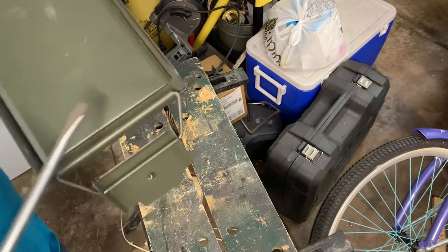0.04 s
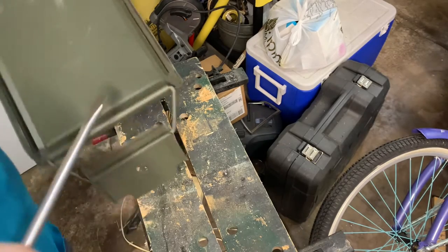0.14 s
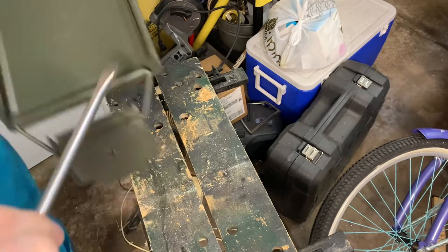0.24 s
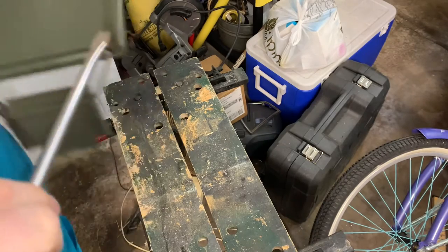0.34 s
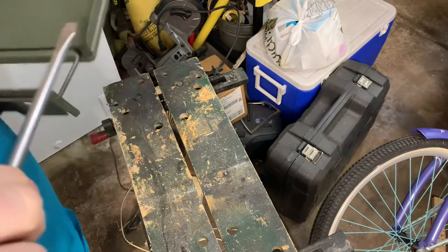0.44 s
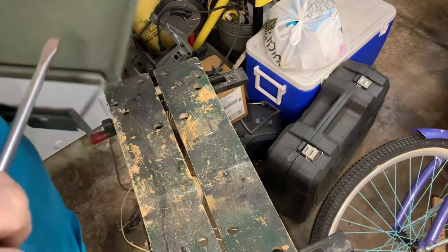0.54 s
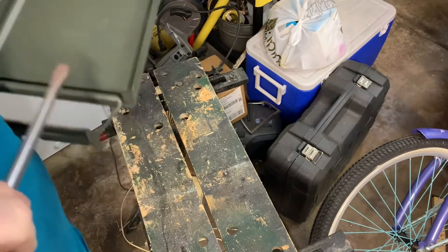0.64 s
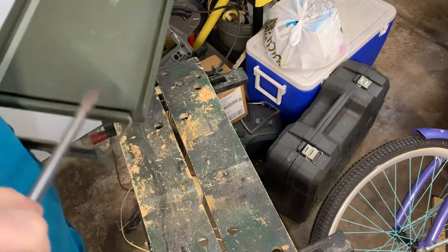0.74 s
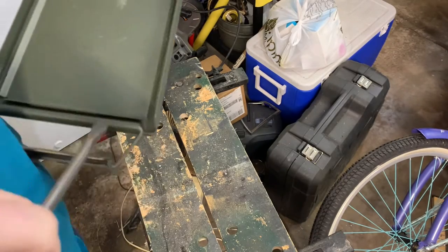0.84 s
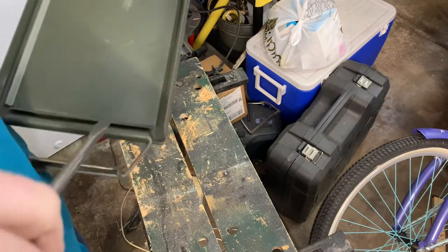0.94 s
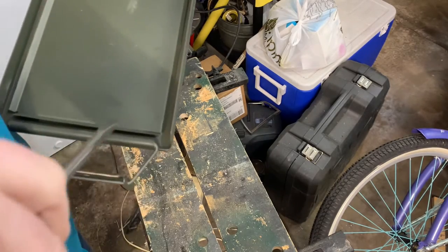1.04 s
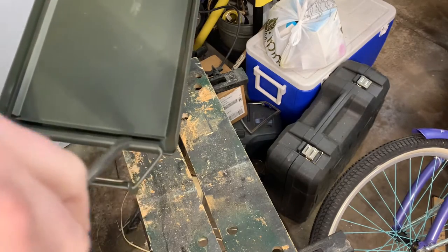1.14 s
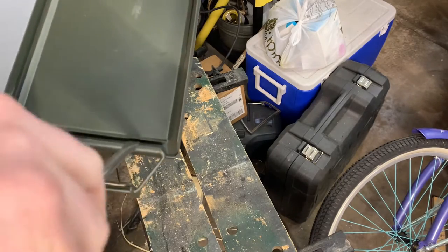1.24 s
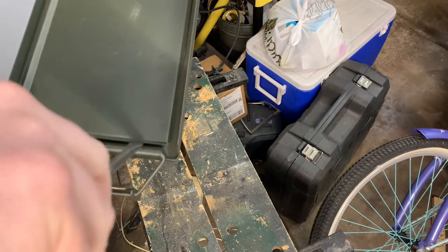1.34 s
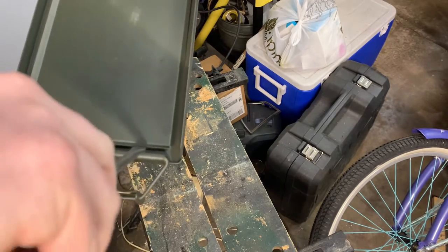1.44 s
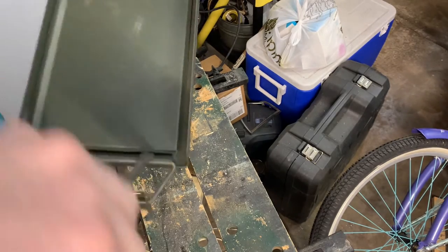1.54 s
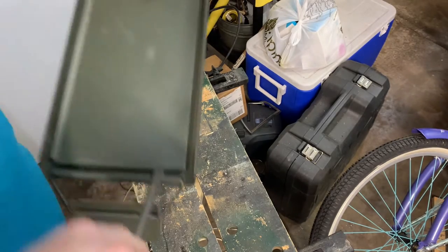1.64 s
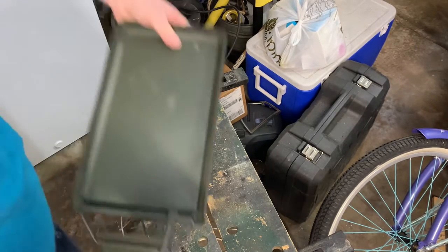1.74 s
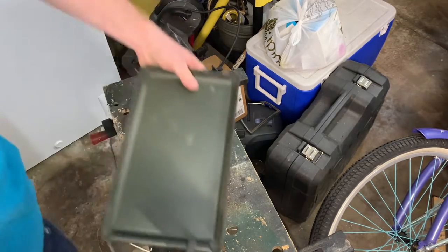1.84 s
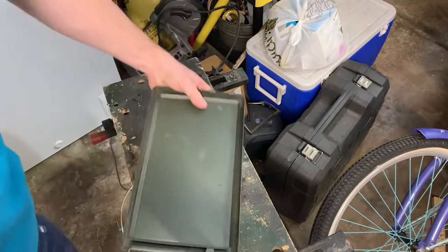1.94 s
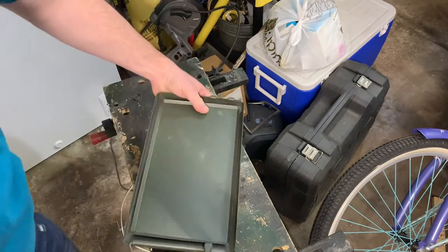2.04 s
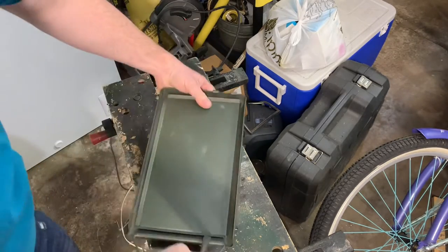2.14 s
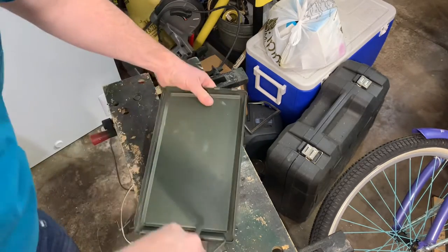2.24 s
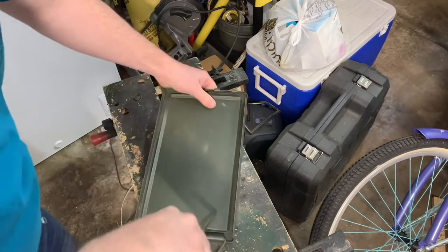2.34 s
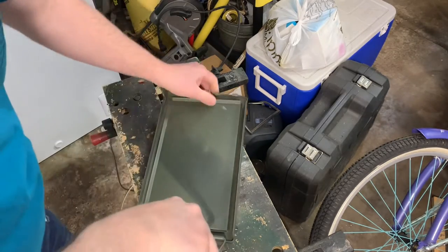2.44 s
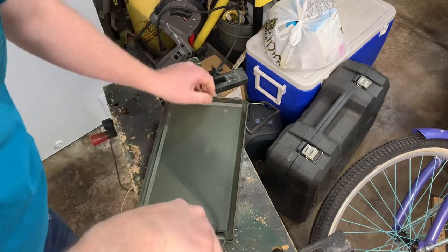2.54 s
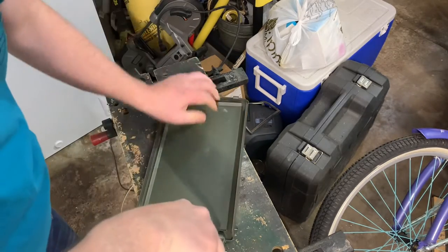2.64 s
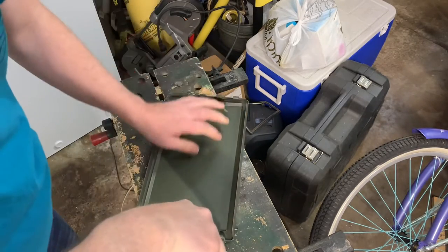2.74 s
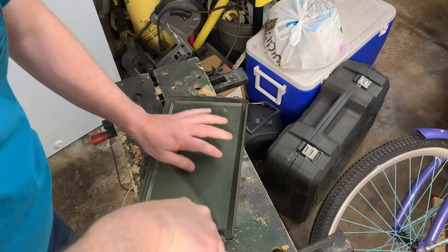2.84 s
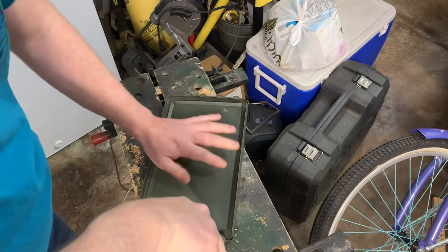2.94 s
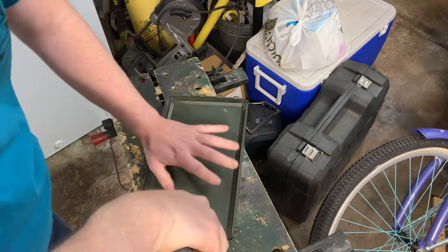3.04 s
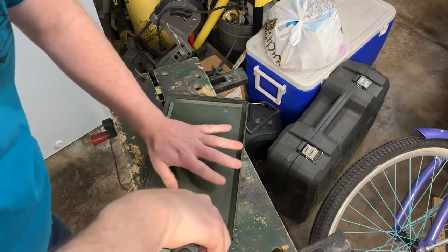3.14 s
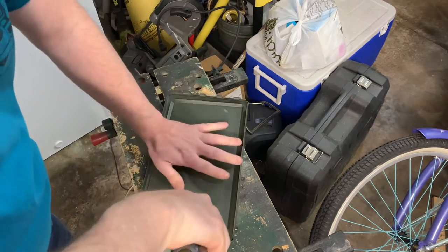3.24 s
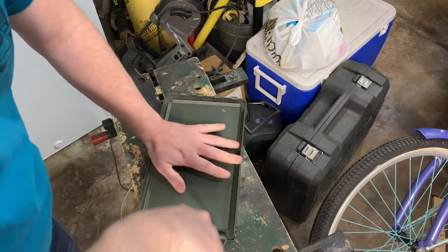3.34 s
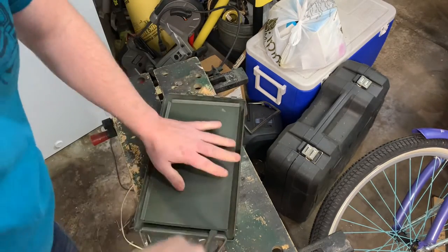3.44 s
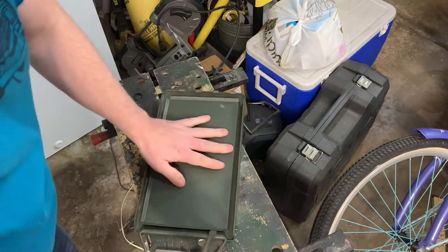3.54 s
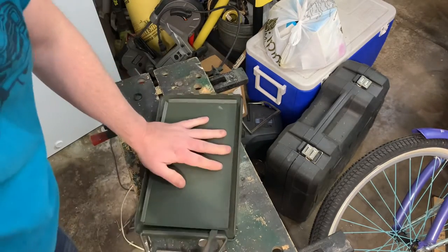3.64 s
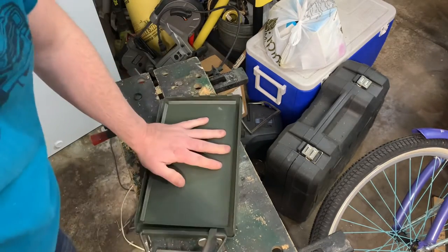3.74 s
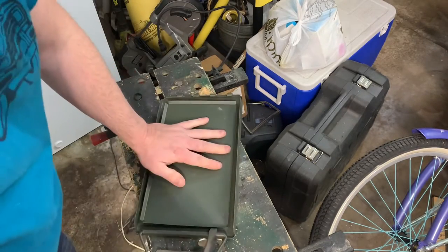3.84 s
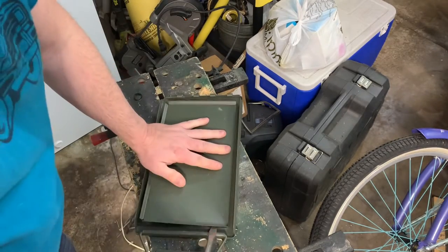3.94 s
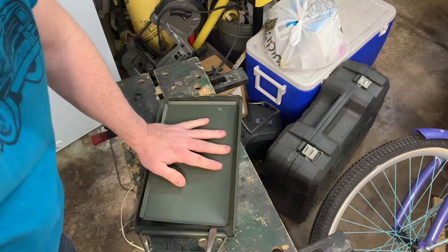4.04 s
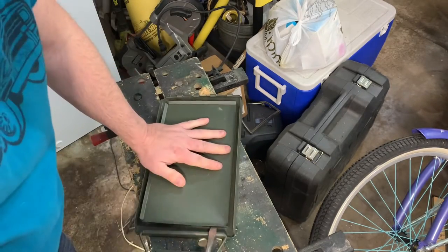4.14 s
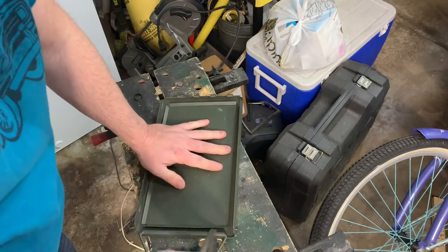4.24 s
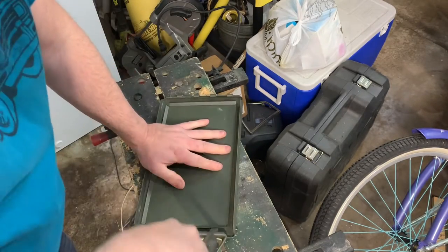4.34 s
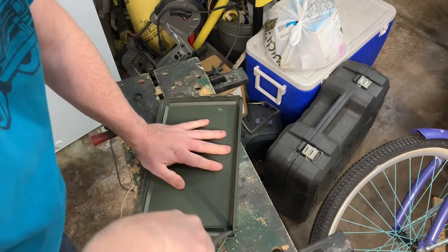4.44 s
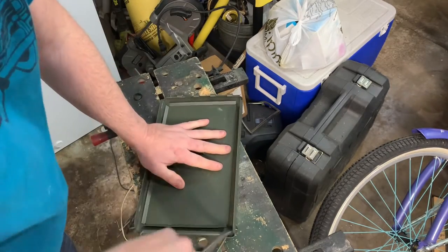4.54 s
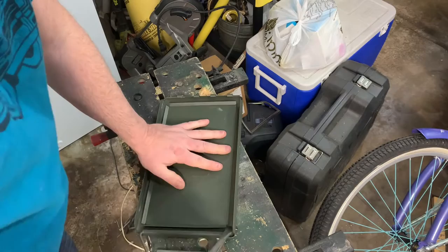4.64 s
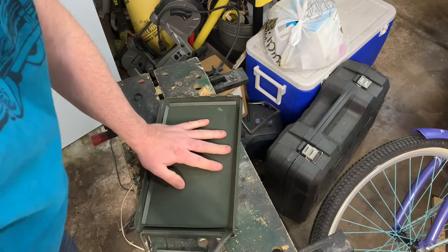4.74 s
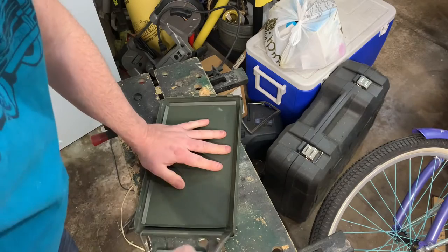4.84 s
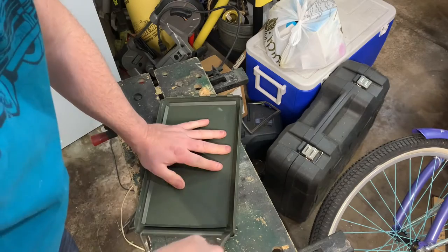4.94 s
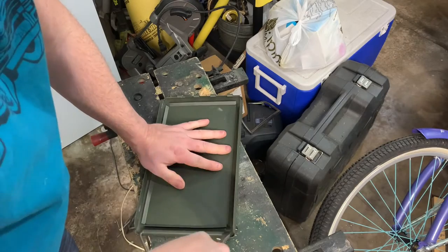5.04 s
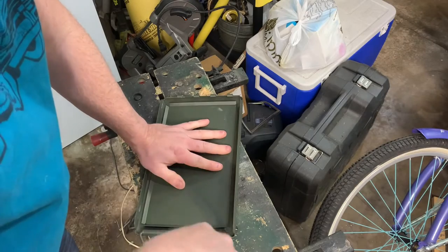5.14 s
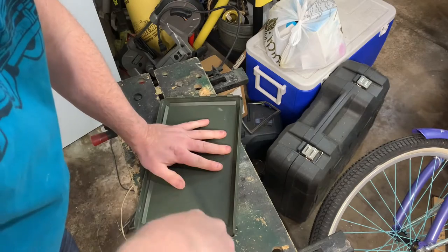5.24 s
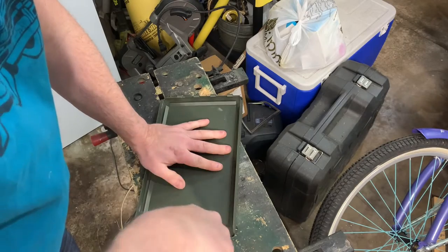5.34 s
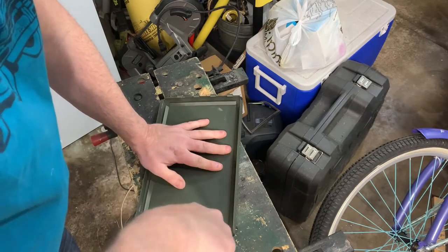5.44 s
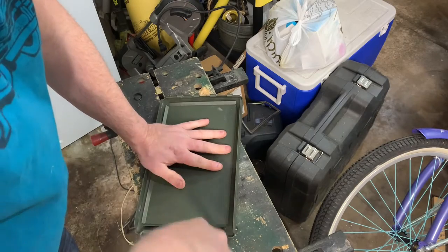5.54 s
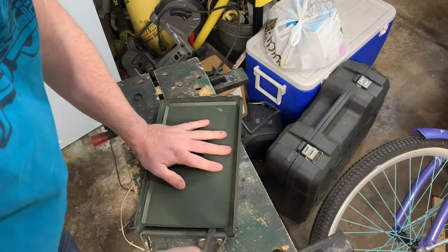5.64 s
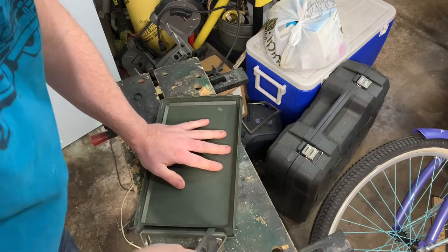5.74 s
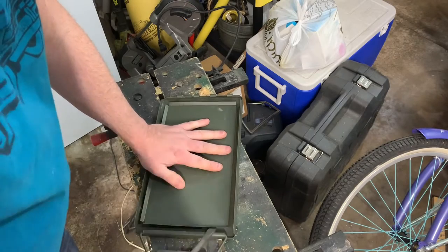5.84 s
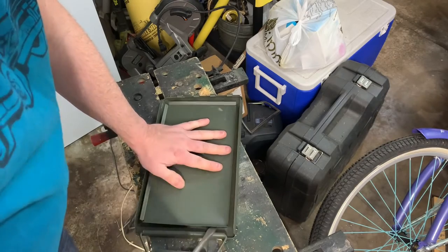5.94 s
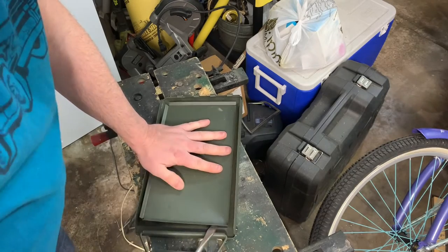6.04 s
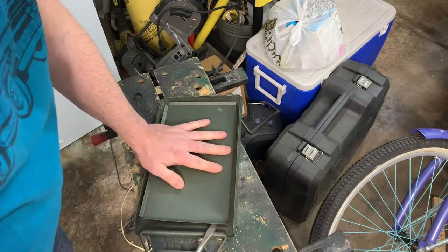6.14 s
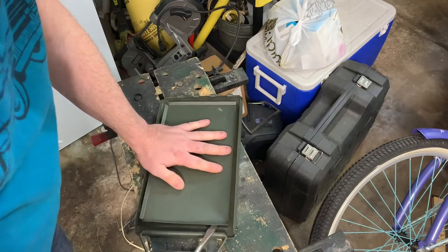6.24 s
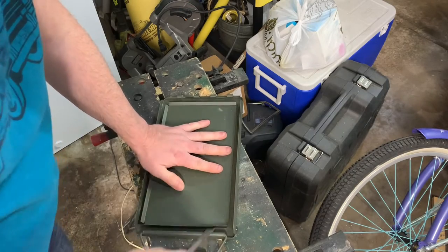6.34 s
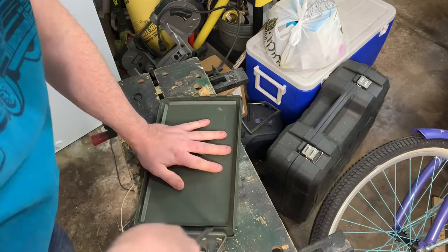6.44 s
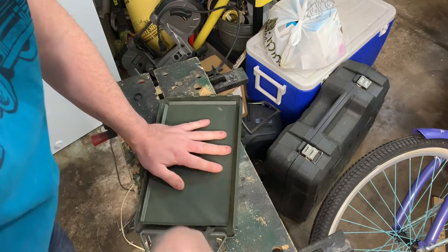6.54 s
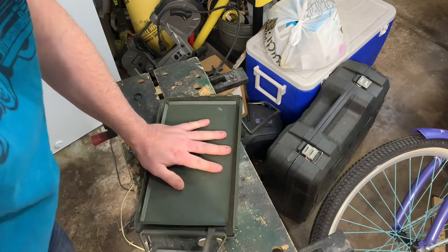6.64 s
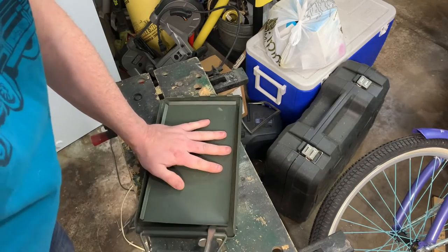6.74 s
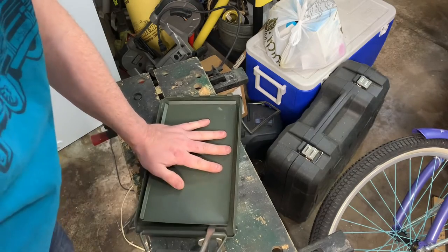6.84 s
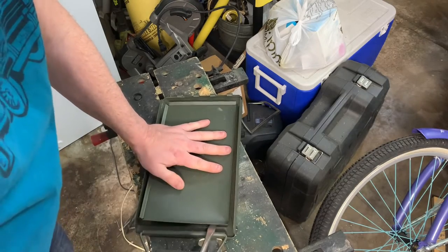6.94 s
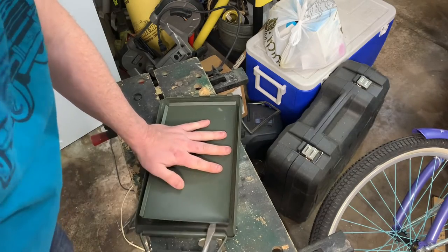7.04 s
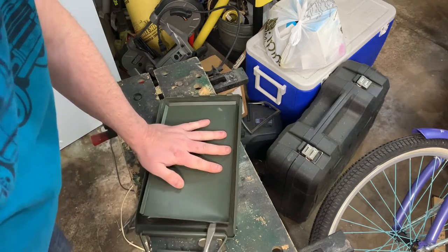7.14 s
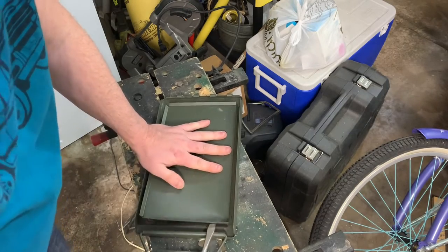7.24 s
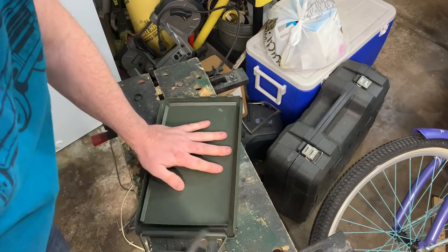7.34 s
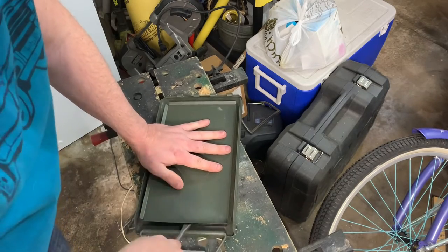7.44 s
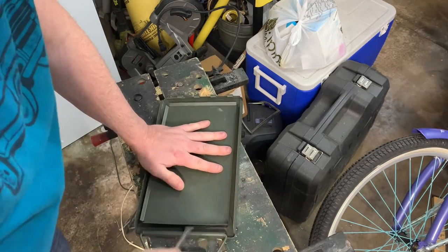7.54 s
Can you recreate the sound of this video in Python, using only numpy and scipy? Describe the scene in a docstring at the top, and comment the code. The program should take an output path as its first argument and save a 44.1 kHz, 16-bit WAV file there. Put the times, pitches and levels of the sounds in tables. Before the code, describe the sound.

Close up at a workbench: quiet scratching and soft taps on a lifted metal lid, a sharp clank and slide as it is set down, then busy rocking clatter with clear ringing. Held firm, the steel plate snaps and knocks in irregular bursts, with two heavy clonks, near silence between some prying attempts, and a final rattling flurry. A low hum lies behind in a reverberant garage.

```python
"""A garage with faint low rumble and motor hum, where a thin steel plate is pried at with a screwdriver,
dropped on a workbench and rocked in its metal lid. Each knock is a faint early touch, the blow and a rebound
on one dense set of decaying modes, which ring longer only while the plate lies loose; flat landings add a
hollow clonk of lid and bench. Lifted or loose, knocks also feed a few long, clear modes. Steel edges ping,
and slide and rub as trains of tiny random blows. Scattered, band-wise decaying echoes answer."""
import sys
import numpy as np
from scipy import signal
from scipy.fft import rfft, irfft, next_fast_len
from scipy.io import wavfile

SR = 44100
rng = np.random.default_rng(int(sys.argv[2]) if len(sys.argv) > 2 else 0)


def generate_wav(sig):
    """Save sig (samples, or channels by samples) to the path in sys.argv[1] as 16-bit PCM at SR."""
    pcm = np.round(np.clip(np.atleast_2d(sig).T, -1, 1) * 32767).astype(np.int16)
    wavfile.write(sys.argv[1], SR, pcm)


N = 334278  # samples
RING_SIZE = 16384  # samples per blow
EDGE_HZ = 15850  # upper band limit

# Plate against lid, bench or blade. Each row: time in seconds, level in dB, bass in dB,
# hardness in dB (low = dull face, high = steel edge), favoured mode in Hz, its relative level in dB, rim in dB.
KNOCKS = [(0.436, -32, 0, -2, 1085, -9, -4), (0.712, -63.5, 5, -13, 1040, -10, -7),
          (0.997, -59, 5, -26, 1053, -9, -3), (1.131, -32.5, 8.5, -22.5, 1368, 1, -0.5),
          (1.167, -36, -8, -2.5, 1360, -13, -8), (1.2639, -22.5, 8.5, 5, 1040, 1, 2),
          (1.482, -46.5, 15.5, -23.5, 940, -4, -5.5), (1.5506, -42, 12, 19.5, 1164, -2, -11),
          (1.62, -42.5, 1.5, -3, 1066, 0.5, 6), (1.697, -49, 4.5, -20.5, 940, 1, -1),
          (1.8442, -18, 7, 18.5, 2470, -13, 2.5), (1.893, -28.5, 9.5, 15, 1013, -8.5, -9.5),
          (2.115, -22, -6.5, -4.5, 540, -5, 2), (2.1283, -9, -4.5, 6, 1590, -9.5, 5),
          (2.143, -29, 14.5, -7.5, 1300, -2.5, -9), (2.194, -14.5, 3, 6.5, 983, -14.5, 1.5),
          (2.289, -16.5, -1, 10.5, 2420, -12, -1.5), (2.456, -25, -2, 4.5, 503, -13, -9),
          (2.472, -19.5, -1, 3.5, 1371, -4, -9), (2.488, -26.5, -2, 9, 1017, 0, -15),
          (2.498, -22, -7, 14, 1300, -12, -5), (2.536, -22, -1.5, 7, 806, -4.5, -1.5),
          (2.557, -29.5, -2.5, -23, 1020, -14, 7), (2.578, -28.5, -20, -11, 1000, 11, 2),
          (2.601, -32, -15, -23, 1070, -7.5, 17), (2.629, -30, -23, 3, 3400, -10, 1),
          (2.698, -31.5, -12, -6, 1000, -14, 8), (2.85, -15.5, -8, -3.5, 880, -10.5, 1.5),
          (3.034, -35.5, 7.5, 12, 1144, -3, 0), (3.047, -18, 1, -18, 1023, -17.5, -3),
          (3.102, -22.5, 3.5, 18, 784, -7, -5.5), (3.287, -34, 9.5, -44, 938, -11.5, 18.5),
          (3.398, -33, 3.5, -3, 950, -5, -19), (3.433, -26, -4.5, 12, 970, -5.5, 1.5),
          (3.619, -16.5, 0.5, -15, 850, 0, 3), (3.642, -19.5, -3.5, 1, 735, -7, 1.5),
          (3.661, -26, 3.5, -11.5, 520, 2, -6.5), (3.887, -4.5, -1.5, -19, 1434, -13.5, 1.5),
          (4.153, -20, 13.5, -11.5, 997, -9, -0.5), (4.162, -9, -2, 2, 1026, -3.5, 3.5),
          (4.169, -9.5, -17.5, 6.5, 1470, -3, -3.5), (4.266, -20.5, 1.5, 0, 940, -0.5, 4.5),
          (4.331, -21.5, -11, -4.5, 990, -11.5, 4), (4.341, -19, -11.5, 6, 1000, -17, 5),
          (4.377, -10.5, -15.5, 7, 934, -3, -3.5), (4.462, -23, -4, -17.5, 951, -2.5, 9),
          (4.623, -19.5, -3, -4, 971, -8, 6), (5.005, -34.5, -9.5, -21, 1693, -10, 16.5),
          (5.058, -33, -4, -14.5, 932, -16, 4), (5.249, -17.5, -4.5, -1.5, 1406, -6, 4.5),
          (5.408, -25.5, -7, 0, 1530, -8.5, 4), (5.426, -16.5, -1.5, 7, 1054, -14.5, 5.5),
          (5.439, -21, -5.5, 7, 2090, -10.5, -3.5), (5.914, -4, -0.5, -17.5, 864, -11, 1.5),
          (6.279, -32.5, -10, -7.5, 1830, -14, 12), (6.31, -22.5, 1.5, -8.5, 1037, -2, 4.5),
          (6.422, -21.5, 3.5, -1.5, 1060, -10.5, 8.5), (6.569, -24.5, 4, -7, 538, -8.5, 6),
          (6.588, -25, -1, -13, 951, -1, 4.5), (7.318, -18, -14, 8.5, 1008, -1.5, 14),
          (7.332, -22, 0, 9.5, 1110, -16.5, 2), (7.346, -16.5, 4.5, 0, 1032, -3.5, -2),
          (7.356, -19, 6.5, -2, 1107, -1, 8), (7.366, -10, -25, -0.5, 918, -13, 1),
          (7.393, -17.5, -4.5, 4.5, 940, -12, 6), (7.416, -26, -2, -2, 1290, -17, 2),
          (7.533, -15.5, -23, 1, 1033, -16, 10.5)]
# Likeness of left and right. Each row: frequency in Hz, likeness from 0 to 1.
STEREO_LIKENESS = [(100, 0.99), (600, 0.74), (1100, 0.39), (3000, 0.66), (5500, 0.44), (8400, 1),
                   (9700, 0.94), (11000, 1), (13300, 0.87), (15000, 0.8)]

LOOSE_FROM_S, LOOSE_UNTIL_S = 1.8, 3.3  # plate lies free, then the hand comes down
LOOSE_T60_S, LIFTED_OR_HELD_T60_S = .18, .12
REBOUND_S = 0.012  # delay of the far edge
SLIPS_PER_S = 190


def amp(db):
    """Decibels to gain."""
    return 10 ** (np.asarray(db) / 20)


def unit(x):
    """Scales to rms 1."""
    return x / np.sqrt(np.mean(x ** 2) + 1e-20)


def read(points, hz):
    """Reads a spectrum on a log-frequency axis."""
    f, value = np.transpose(points)
    return np.interp(np.log(hz + 1), np.log(f + 1), value)


def add(mix, start_s, sound):
    """Lays a sound into the mix from start_s, cut off at the end."""
    part = mix[:, max(round(start_s * SR), 0):][:, :sound.shape[-1]]
    part += sound[..., :part.shape[1]]


def drift(count):
    """Slow random curve through count standard-normal points over the whole scene."""
    return np.interp(np.arange(N), np.linspace(0, N, count), rng.standard_normal(count))


def pair(z, hz):
    """Makes two unrelated spectra partly alike: a wide or narrow stereo image."""
    same = np.clip(read(STEREO_LIKENESS, hz), 0, 1)
    return np.array([z[0], same * z[0] + np.sqrt(1 - same ** 2) * z[1]])


def mode(hz, db, t60_s):
    """One dying sine, with a somewhat different phase left and right."""
    t60_s = max(t60_s, .01)
    t = np.arange(min(round(1.3 * t60_s * SR), RING_SIZE)) / SR
    apart_rad = np.sqrt(2 * max(1 - read(STEREO_LIKENESS, hz), 0)) * rng.standard_normal()
    wave = np.exp(2j * np.pi * (hz * t + rng.random()) - np.log(1000) * t / t60_s)
    out = np.zeros((2, RING_SIZE))
    out[:, :len(t)] = np.sqrt(2) * amp(db) * np.array([wave.imag, (wave * np.exp(1j * apart_rad)).imag])
    return out


def contact_rise(contact_s):
    """Exponential onset: a contact of finite length softens the attack."""
    return 1 - np.exp(-np.arange(RING_SIZE) / SR / contact_s)


def background():
    """Uneven low room rumble and the unsteady hum of a motor."""
    # Each row: frequency in Hz, relative density in dB per Hz.
    air_spectrum = [(25, -22), (60, -6), (90, -9.5), (125, -6), (175, -16), (300, -14.5), (800, -29),
                    (2500, -33.5), (8000, -40.5), (16000, -37)]
    # Each row: frequency in Hz, level in dB before the floor curve.
    hum_lines = [(59, -90.5), (118, -68.5), (237, -83.5)]
    # Gain over time, sinking briefly near the end. Each row: time in seconds, gain in dB.
    floor = [(0, -1), (0.3, 1.5), (4.5, 3), (5.8, -0.5), (6.65, 6), (6.95, -8), (7.2, -7), (7.35, 1)]
    air_db, swell_db, unsteady = -66.5, 2.5, .55
    hz, t = np.fft.rfftfreq(N, 1 / SR), np.arange(N) / SR
    noise = rfft(rng.standard_normal((2, N)))
    air = unit(irfft(pair(noise, hz) * amp(read(air_spectrum, hz)), N))
    hum = 0
    for f, db in hum_lines:
        waver = 1 + unsteady * (drift(count=70) + 1j * drift(count=90))  # amplitude and phase
        tone = np.exp(2j * np.pi * (f * t + rng.random()))
        hum = hum + np.sqrt(2) * amp(db) * (waver * tone).real
    rumble = amp(air_db + swell_db * drift(count=40)) * air
    return amp(np.interp(t, *np.transpose(floor))) * (rumble + hum)


def garage(x, build_s=0.0013, first_s=0.011, echoes_per_s=4000):
    """Scattered echoes from bench, clutter and walls, each band dying at its own speed."""
    # Each row: frequency in Hz, T60 in seconds.
    decay = [(100, 0.12), (400, 0.47), (1000, 0.54), (3000, 0.56), (7000, 0.46), (15000, 0.12)]
    taps = rng.choice([-1., 1.], (2, SR)) * (rng.random((2, SR)) < echoes_per_s / SR)
    hz, t, z = signal.stft(taps, SR, nperseg=256)
    z = pair(z, hz[:, None]) * np.exp(-np.log(1000) * t / read(decay, hz)[:, None])
    tail = signal.istft(z, SR, nperseg=256)[1]
    since_first_s = np.maximum(np.arange(tail.shape[1]) / SR - first_s, 0)
    tail *= 1 - np.exp(-since_first_s / build_s)
    return signal.fftconvolve(x, tail / np.linalg.norm(tail[0]), axes=1)[:, :N]


def crowd_bins(count=900):
    """A thin plate has about equally many modes in every band: one at a random place in each slot."""
    slots = (np.arange(count) + rng.random(count)) / count
    return (slots * EDGE_HZ * RING_SIZE / SR).astype(int) + 1


def ring_at(s):
    """T60 of the dense modes: longer only while the plate lies loose; lifted or held it is shorter."""
    return LOOSE_T60_S if LOOSE_FROM_S < s < LOOSE_UNTIL_S else LIFTED_OR_HELD_T60_S


def strike(bins, bass_db, bright_db, top_db, rim_db, ring_s, spread_db=4.0, treble_spread_db=3,
           treble_ring=0.29, treble_hz=4500, crack_db=3, crack_t60_s=0.0065, detune=.01):
    """One blow: the contact point sets how strongly each mode rings, its hardness sets the colour."""
    # Weaker modes. Each row: frequency in Hz, relative density in dB per Hz.
    crowd = [(30, -40), (80, -10), (150, -9.5), (220, -13.5), (300, -9.5), (420, -8), (700, -1.5),
             (1000, -3), (1400, -1), (1800, -4), (2400, -4.5), (4000, -6.5), (6000, -11), (7300, -12),
             (8300, -12.5), (9600, -9.5), (12500, -18.5), (15500, -21.5)]
    # Each row: frequency in Hz, level in dB before colour and overall strength.
    prominent_modes = [(165, -30.5), (380, -23.5), (495, -28.5), (620, -25), (783, -30), (945, -12),
                       (1035, -15.5), (1290, -20.5), (1458, -17), (1665, -29.5), (2060, -25.5), (2225, -31),
                       (2735, -34.5), (2953, -27), (3590, -25)]
    prominent_db, prominent_ring = 1.5, .6  # strongly driven modes die sooner: share of the plate's ring
    rim_hz = 2120  # modes brought out by a blow on the folded rim
    colour = [(450, bass_db), (800, 0), (1600, 0), (rim_hz, bright_db + rim_db),
              (3000, bright_db), (5000, bright_db), (8500, top_db)]
    t, hz = np.arange(RING_SIZE) / SR, bins * SR / RING_SIZE
    high = 1 / (1 + (treble_hz / hz) ** 2)  # high modes die sooner and depend more on the contact point

    size = amp(read(crowd, hz))
    size = size / np.linalg.norm(size) * amp(read(colour, hz))
    chance = np.clip(rng.standard_normal(len(hz)), -2, 2)
    size *= unit(amp((spread_db + treble_spread_db * high) * chance))
    # neighbouring modes share nodes, so they are strong or weak in groups
    patch_db, patch_count = 3, 70
    patches = np.interp(hz, np.linspace(0, EDGE_HZ, patch_count), rng.standard_normal(patch_count))
    size *= unit(amp(patch_db * patches * np.sqrt(high)))

    body = (np.sqrt(1 - high), ring_s)
    treble = (high, ring_s * treble_ring)
    crack = (high * amp(crack_db), crack_t60_s)  # steel meeting steel
    out = np.zeros((2, RING_SIZE))
    for share, t60_s in (body, treble, crack):
        phases = np.exp(2j * np.pi * rng.random((2, len(hz))))
        spectrum = np.zeros((2, RING_SIZE // 2 + 1), complex)
        spectrum[:, bins] = size * share * pair(phases, hz)
        out += irfft(spectrum) * RING_SIZE / np.sqrt(2) * np.exp(-np.log(1000) * t / t60_s)
    for f, db in prominent_modes:  # each new resting position shifts the modes a little
        shift, loud = rng.standard_normal(2)
        mode_db = prominent_db + db + read(colour, f) + spread_db * loud
        out += mode(f * (1 + detune * shift), mode_db, prominent_ring * ring_s)
    return out


def scrape(bins, start_s, level_db, colour, slips_per_s, point_count=4):
    """A sliding edge catches and slips at a few points; each slip is a tiny blow coloured (bass, bright, top, rim)."""
    slip_spread_db, slip_ring = 5, .6  # a pressing edge leaves this share of the ring
    grip_s = .008  # time the edge takes to bite
    chance, size, point = rng.random((3, 2 * SR))[:, :len(level_db)]
    slip_sizes = amp(slip_spread_db * np.minimum(-np.log(1 - size), 3))
    slips = (chance < slips_per_s / SR) * slip_sizes / np.sqrt(slips_per_s / SLIPS_PER_S)
    grip = np.minimum(np.arange(len(slips)) / SR / grip_s, 1)
    slips = unit(slips) * amp(level_db[:len(slips)]) * grip
    out = np.zeros((2, N))
    for k in range(point_count):
        tick = strike(bins, *colour, slip_ring * ring_at(start_s))
        slips_here = slips * ((point * point_count).astype(int) == k)
        add(out, start_s, signal.fftconvolve(slips_here[None], tick / np.linalg.norm(tick[0]), axes=1))
    return out


def rubs(bins, rub_s=.045, fade_db=-6, slips_per_s=700, top_db=-14, rim_db=7):
    """The blade shifts on the steel: brief, faint trains of dense slips."""
    # Each row: start in seconds, level in dB, bass in dB, brightness in dB.
    rub_list = [(0.711, -59.5, 10, -7), (0.901, -64.5, 9, -7), (0.996, -58, 8, -23), (1.088, -64, 2, -4),
                (4.987, -44, -3, 4), (6.869, -57, -1.5, -11), (6.998, -62.5, -4.5, -6.5),
                (7.035, -66.5, 1, 1), (7.164, -60.5, -6.5, 0), (7.205, -67, -6, -2)]
    out = np.zeros((2, N))
    for s, db, bass_db, bright_db in rub_list:
        level_db = np.linspace(db, db + fade_db, max(round(rub_s * SR), 2))
        out += scrape(bins, s, level_db, (bass_db, bright_db, top_db, rim_db), slips_per_s)
    return out


def slides(bins, range_db=30, top_db=-3, rim_db=1):
    """An edge slides, builds up to a peak and chatters out in uneven slips."""
    # Each row: peak time in seconds, level in dB, build-up in seconds, run-out in seconds, brightness in dB.
    slide_list = [(0.333, -53.5, 0.097, 0.33, 1), (.5, -54.5, 0.11, 0.29, 14), (1.252, -46, 0.2, 0.27, -12),
                  (1.502, -62.5, 0.64, .1, 20), (1.851, -23.5, 0.033, 0.16, 2.5),
                  (2.125, -19, 0.046, 0.018, -0.5), (2.231, -34.5, 0.27, 0.11, 2),
                  (2.47, -32, .2, 0.64, -8.5), (2.498, -19.5, 0.081, 0.089, 8),
                  (3.13, -24.5, 0.03, 0.19, 1), (3.652, -18.5, 0.044, 0.074, 7),
                  (4.335, -28.5, 0.0076, 0.18, 4), (5.446, -37, 0.021, 0.16, 11),
                  (6.285, -52, 0.1, 0.058, 17), (6.76, -66, 0.0084, 0.095, 15),
                  (6.891, -64, 0.055, 0.15, -3.5), (7.275, -44, 0.067, 0.16, 4.5),
                  (7.329, -27.5, 0.088, 0.25, 8.5), (7.535, -21.5, 0.061, 0.067, 4)]
    light_db, finer_per_db = -32, .8  # below light_db slips come faster: dB of rate per dB
    out = np.zeros((2, N))
    for s, db, build_s, fade_s, bright_db in slide_list:
        swell = np.linspace(db - range_db, db, max(round(build_s * SR), 2))
        fade = np.linspace(db, db - range_db, max(round(fade_s * SR), 2))
        level_db = np.concatenate([swell, fade])
        rate = SLIPS_PER_S * amp(finer_per_db * np.maximum(light_db - level_db, 0))
        out += scrape(bins, s - build_s, level_db, (0, bright_db, bright_db + top_db, rim_db), rate)
    return out


def pings(contact_s=0.0014, t60_at_1khz_s=.36, slope=.45):
    """Steel edges ring after a glancing blow, and near 2.56 s the loose plate, let go, rings on a few of its
    own modes; higher tones die sooner."""
    # Each row: time in seconds, frequency in Hz, level in dB.
    ping_list = [(1.133, 1415, -39.5), (1.167, 2444, -48), (1.8445, 12320, -17), (1.8445, 11050, -28),
                 (1.95, 7741, -33), (2.13, 12320, -31), (2.5, 15354, -28), (2.559, 1020, -29),
                 (2.559, 1280, -33), (2.629, 2320, -42), (3.102, 7570, -26), (3.641, 7095, -25.5),
                 (3.641, 5550, -32), (4.171, 12320, -31), (4.377, 15354, -30), (5.43, 7095, -31),
                 (5.43, 5550, -37), (5.43, 3760, -35)]
    out = np.zeros((2, N))
    for s, hz, db in ping_list:
        t60_s = t60_at_1khz_s / (hz / 1000) ** slope
        add(out, s, mode(hz, db, t60_s) * contact_rise(contact_s))
    return out


def slams(contact_s=0.0007, t60_s=.058, rebound_db=-3.5):
    """A flat landing rings the lid and the wood under it with a short hollow clonk, and again on the rebound."""
    # Each row: time in seconds, relative level in dB.
    slam_list = [(1.264, -30), (2.128, -22.5), (3.621, -24.5), (3.645, -22.5), (3.662, -38), (3.887, -5.5),
                 (4.156, -31.5), (4.463, -29.5), (5.9135, -7), (6.588, -31.5)]
    # Lid and bench top together. Each row: frequency in Hz, relative level in dB.
    lid_modes = [(75, -26), (125, -36.5), (360, -17), (495, -7), (622, -0.5), (665, -7.5), (783, 1.5),
                 (850, -1), (945, -0.5), (1290, -8), (1440, -7)]
    out = np.zeros((2, N))
    rise = contact_rise(contact_s)
    for s, db in slam_list:
        for at_s, level_db in ((s, db), (s + REBOUND_S, db + rebound_db)):
            add(out, at_s, rise * sum(mode(hz, level_db + mode_db, t60_s) for hz, mode_db in lid_modes))
    return out


def singing(contact_s=0.00089, lifted_t60_s=.33, loose_t60_s=.42, spread_db=2):
    """Until the hand comes down, knocks also feed a few long, clear modes; the plate's support decides which."""
    # Plate lifted by one edge. Each row: frequency in Hz, level in dB relative to the knock.
    lifted_modes = [(598, -23), (680, -20), (1036, -22), (1420, -21), (1836, -27), (2288, -22), (2525, -26),
                    (2800, -23)]
    # Plate lying loose. Each row: frequency in Hz, level in dB relative to the knock.
    loose_modes = [(1015, -22), (1280, -25), (1460, -28), (2320, -26), (2710, -30)]
    out = np.zeros((2, N))
    rise = contact_rise(contact_s)
    for s, db, *_ in KNOCKS:
        if s >= LOOSE_UNTIL_S:
            continue
        lifted = s < LOOSE_FROM_S
        modes, t60_s = (lifted_modes, lifted_t60_s) if lifted else (loose_modes, loose_t60_s)
        for hz, mode_db in modes:
            add(out, s, rise * mode(hz, db + mode_db + spread_db * rng.standard_normal(), t60_s))
    return out


def knock(bins, db, bass_db, hard_db, rim_db, hz, mode_db, ring_s):
    """One landing: hardness brightens it, weight dulls it, and the contact point favours one mode."""
    favoured_db, favoured_ring = 3.5, .45  # share of the plate's ring
    # middle treble follows hardness less than the top; heavy blows press longer and sound duller
    bright_db = -0.5 + 0.35 * hard_db - 0.11 * db
    blow = strike(bins, bass_db, bright_db, hard_db, rim_db, ring_s)
    return amp(db) * (blow + mode(hz, favoured_db + mode_db, favoured_ring * ring_s))


def knocks(bins, contact_s=0.0014, touch_s=0.0095, touch_db=-25.5):
    """The plate drops, rocks and snaps against the lid: a faint early touch, the blow, a rebound."""
    rebound_hard_db = 4.5  # the far edge always lands hard
    out = np.zeros((2, N))
    rise = contact_rise(contact_s)
    for s, db, bass_db, hard_db, hz, mode_db, rim_db in KNOCKS:
        early, late = rng.uniform(.8, 1.2, 2)
        ring_s = ring_at(s)
        blow = rise * knock(bins, db, bass_db, hard_db, rim_db, hz, mode_db, ring_s)
        rebound_db = db - 1.5 + .7 * db  # softer knocks rebound even less
        rebound = rise * knock(bins, rebound_db, bass_db, rebound_hard_db, rim_db, hz, mode_db, ring_s)
        add(out, s - touch_s * early, amp(touch_db) * blow)  # faint copy of the blow
        add(out, s, blow)
        add(out, s + REBOUND_S * late, rebound)
    return out


def scene(direct_db=-1.5, room_db=-14, lid_room_db=-9, turn_hz=1.3):
    """The plate, the lid a little to the left, their echoes and the quiet garage."""
    bins = crowd_bins()
    plate = knocks(bins) + pings() + singing() + slides(bins) + rubs(bins)
    lid = slams() * amp([[-1.5], [-5.5]])  # left, right
    thrown = plate + amp(lid_room_db) * lid  # the lid lies under the plate and throws less into the room
    angle = 2 * np.pi * turn_hz * np.arange(N) / SR  # two echo tails take turns, so echoes vary between knocks
    echoes = garage(thrown) * np.cos(angle) + garage(thrown) * np.sin(angle)
    return amp(direct_db) * (plate + lid) + amp(room_db) * echoes + background()


def record(dry):
    """Two channels set apart by frequency-dependent phase and balance, soft overload, then the band limit."""
    # Each row: frequency in Hz, phase difference between left and right in radians.
    stereo_phase = [(100, 0), (700, 0.9), (1450, -0.1), (2600, 2.2), (4000, 1.9), (5300, 2.5), (6200, 1.4),
                    (7000, -0.8), (8400, -3.14), (9500, -4.2), (10700, -6.2), (11800, -6.8), (12600, -9),
                    (14300, -10.1), (14900, -12.1), (15800, -12.5)]
    # Each row: frequency in Hz, left minus right in dB.
    stereo_balance = [(100, -3), (380, -1.5), (750, 1), (1300, 0), (2000, 0), (5200, -3), (7000, -0.5),
                      (15000, 1)]
    size = next_fast_len(N + 4096)
    hz = np.fft.rfftfreq(size, 1 / SR)
    balance = amp(read(stereo_balance, hz) / 2)
    channels = np.array([balance, np.exp(-1j * read(stereo_phase, hz)) / balance])
    heard = irfft(rfft(dry, size) * channels, size)[:, :N]
    heard = heard / (1 + heard ** 4) ** (1 / 4)  # rounds off the hardest peaks
    lowpass = signal.firwin(301, EDGE_HZ, window=("kaiser", 9), fs=SR)
    return signal.oaconvolve(heard, lowpass[None], "same", axes=1)


dry = scene()
out = record(dry)
generate_wav(out)
```